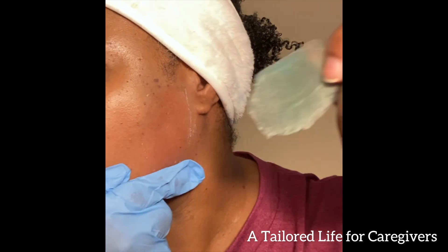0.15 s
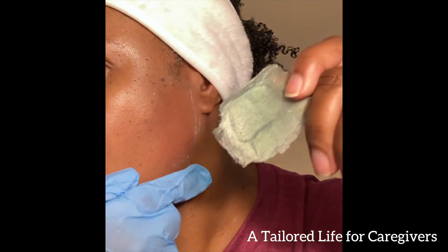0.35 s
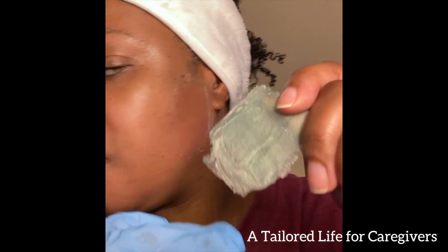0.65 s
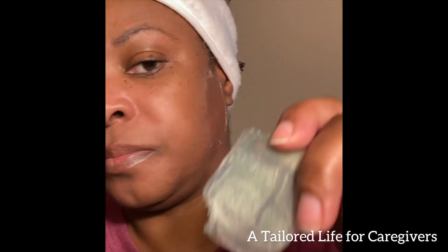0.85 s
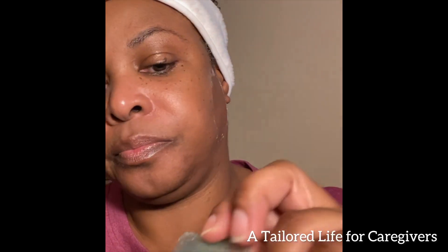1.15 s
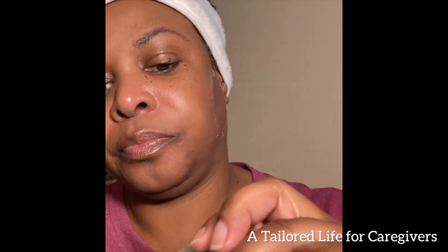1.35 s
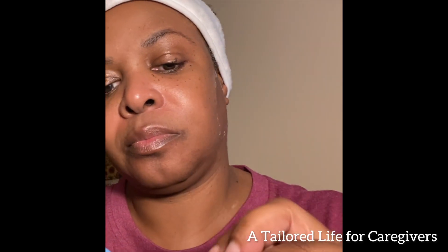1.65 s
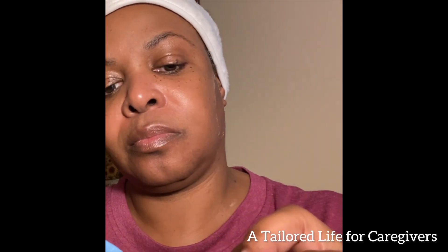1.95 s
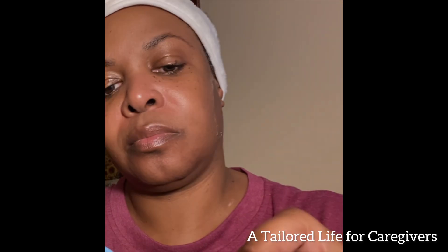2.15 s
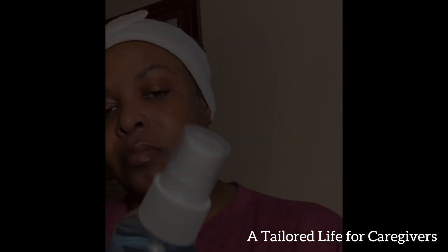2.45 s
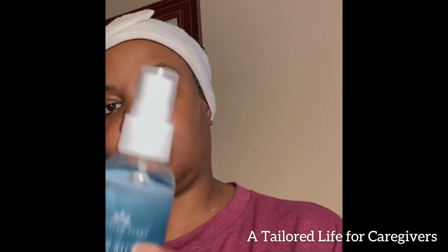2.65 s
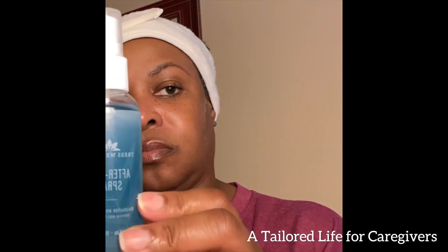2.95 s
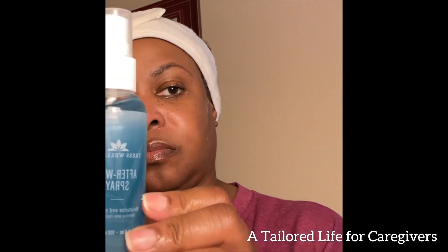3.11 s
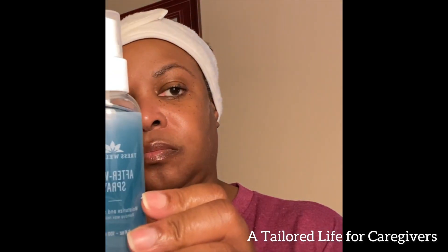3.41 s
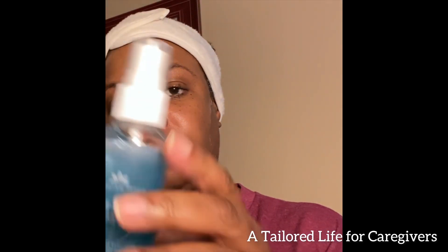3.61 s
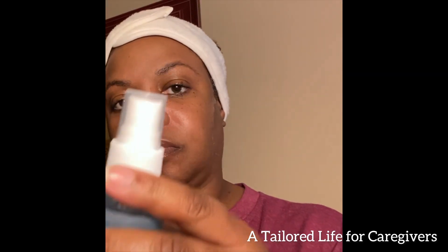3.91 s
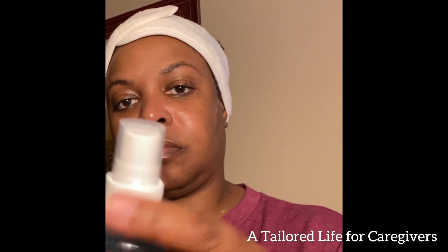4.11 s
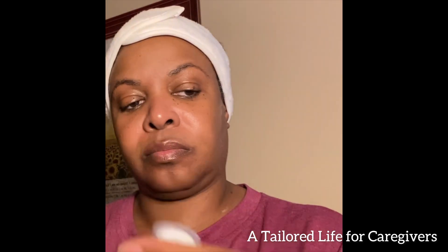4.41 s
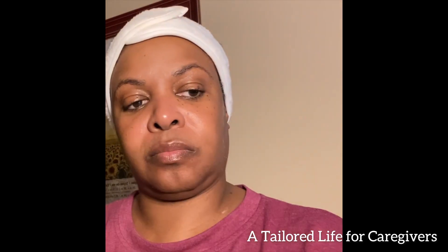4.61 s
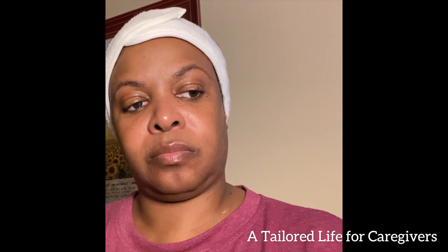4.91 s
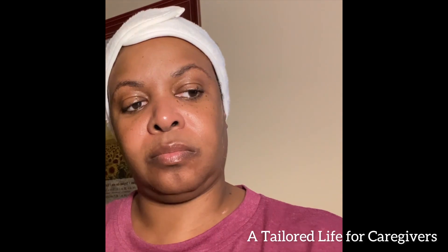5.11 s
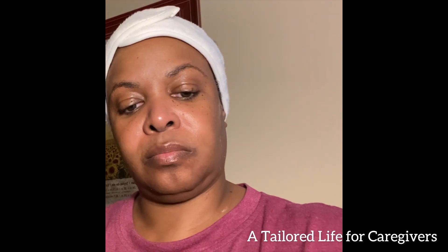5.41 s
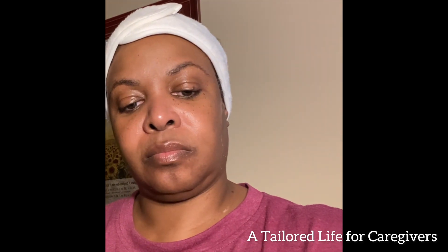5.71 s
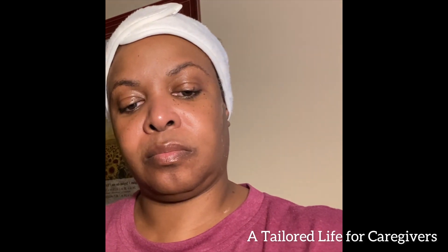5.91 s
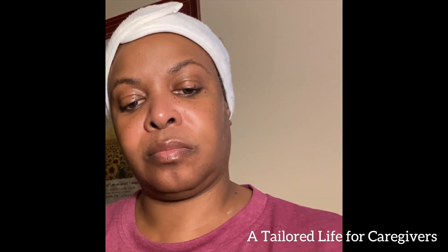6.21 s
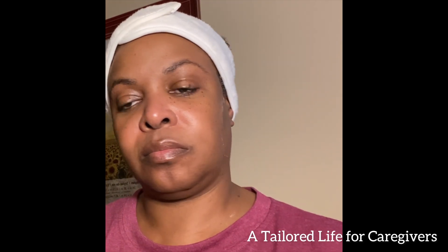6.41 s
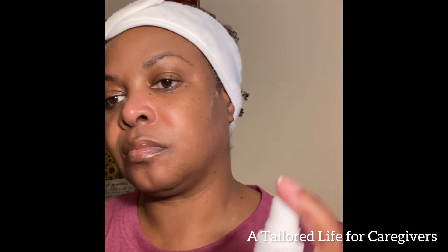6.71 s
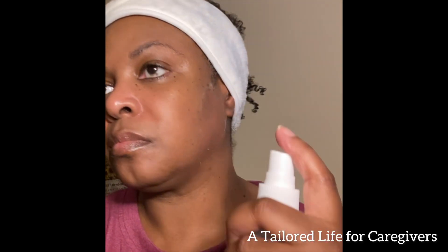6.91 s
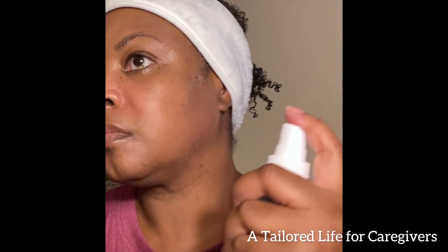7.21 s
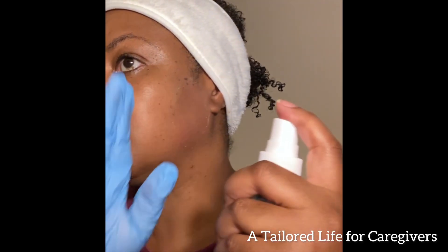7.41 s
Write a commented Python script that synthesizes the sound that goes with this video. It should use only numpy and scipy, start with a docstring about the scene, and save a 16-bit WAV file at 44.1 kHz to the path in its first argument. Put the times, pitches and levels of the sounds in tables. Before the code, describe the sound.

A quiet indoor space with ventilation running for about seven and a half seconds, captured by a single microphone at very low level. The sound is already present at the start and continues unbroken to the end. Deep, soft rumble and boom carry most of the weight, fluttering irregularly, with a slightly stronger low surge around 5.4 seconds. A faint steady motor hum sits underneath, with an almost inaudible thin whine above. Duct resonances make the air hollow; a soft mid-low drone, part breathy noise and part wavering tone, comes forward around 1.4 to 1.7, briefly near 2.8, again near 3.9, and gently around 5.7 and 7.1 seconds. Midrange air lifts very slightly near 2.3 and 4.6 seconds. The dull, thin hiss stays even throughout. No speech, spraying, clicks or handling sounds are heard.

```python
"""Ventilated room

A quiet indoor space with the ventilation running, picked up by one microphone.
Moving air is noise coloured by the narrow resonances and nulls of duct and room: it rumbles and hisses.
Several bands swell; the strongest resonance, part noise and part wandering sine, sings as a soft drone.
The fan motor adds a faint hum and a thin whine, made of three sines."""
import sys
import numpy as np
from scipy.fft import rfft, irfft, next_fast_len
from scipy.io import wavfile
from scipy.ndimage import uniform_filter1d, map_coordinates

SR = 44100
rng = np.random.default_rng(int(sys.argv[2]) if len(sys.argv) > 2 else 0)


def unload_wav(signal):
    """Save mono or channel-first audio to the path in sys.argv[1] as 16-bit WAV at rate SR, clipped to [-1, 1]."""
    wavfile.write(
        sys.argv[1],
        SR,
        np.round(np.clip(np.atleast_2d(signal).T, -1, 1) * 32767).astype(np.int16),
    )


N = 332955  # length in samples

# resting rms levels of the swelling bands, in dB
RUMBLE_DB, BOOM_DB, ROOM_MODE_DB = -55.5, -57, -64
DRONE_DB, OVERDRONE_DB, RUSH_DB = -68, -67, -68
# the sine within the drone: centre pitch, pitch wander, and its share of the drone's power (0 to 1)
DRONE_HZ, DRONE_WANDER_HZ, DRONE_TONE_SHARE = 473.4, 1.4, 0.72
TOP_HZ = 14500  # upper band limit of the recorder


def amp(db):
    """Decibels to amplitude gain."""
    return 10 ** (np.asarray(db) / 20)


def along(points, hz):
    """Join (Hz, value) points by straight lines on a log frequency axis."""
    point_hz, value = np.transpose(points)
    return np.interp(np.log(hz + 1), np.log(point_hz + 1), value)


def wobble(rate):
    """A smooth random curve through rate random knots a second."""
    knots = rng.standard_normal(int(N * rate / SR) + 4)
    return map_coordinates(knots, [np.arange(N) * rate / SR])


def filtered(x, response):
    """Shape the spectrum of x by a gain that depends on frequency."""
    size = next_fast_len(N + SR // 2)  # padded so the end does not wrap onto the start
    hz = np.fft.rfftfreq(size, 1 / SR)
    return irfft(rfft(x, size) * response(hz), size)[:N]


def band(x, low_hz, high_hz):
    """The part of x between two frequencies, with sharp edges."""
    return filtered(x, lambda hz: (hz > low_hz) & (hz < high_hz))


def tone(hz, wander_hz):
    """A sine of rms 1 that wanders slightly in pitch, from a random starting phase."""
    turns = np.cumsum(hz + wander_hz * wobble(rate=8)) / SR + rng.random()
    return np.sqrt(2) * np.sin(2 * np.pi * turns)


def swelling(x, rest_db, swells):
    """Level a band slowly, then let it rise in bell-shaped swells; its fast flutter stays random."""
    t = np.arange(N) / SR
    # length_s spans the points where the lift is half its peak in dB
    lift_db = sum(rise_db * 0.5 ** ((2 * (t - peak_s) / length_s) ** 2)
                  for peak_s, length_s, rise_db in swells)
    # two quarter-second averages in a row
    power = uniform_filter1d(uniform_filter1d(x ** 2, size=SR // 4), size=SR // 4)
    levelled = x / np.sqrt(np.abs(power) + 1e-20)
    return levelled * amp(rest_db + lift_db)


def duct_colour(hz):
    """The broad spectrum of turbulence, lifted at every resonance and notched at every null."""
    # air noise before resonances, nulls and band levelling: pitch_hz, density_db (per Hz)
    air_spectrum = [(20, -94), (30, -97.5), (36, -75.5), (130, -75.5), (200, -80), (330, -85), (520, -90.5),
                    (700, -93.5), (1400, -101.2), (1600, -103.1), (2700, -110.5), (6500, -118.6),
                    (11800, -124.9), (14400, -131.4)]
    # resonances of duct and room: centre_hz, half_width_hz, added_db (peak power added, relative to the air)
    resonances = [(53.8, 1.8, 6), (75.4, 11, 7.5), (100, 2.7, 8.5), (181, 17.7, 3), (223.7, 6, 3),
                  (251, 2.7, 5), (261.6, 6, 11), (284, 4.6, 2), (300, 4.7, 2.5), (374.3, 4.5, 6.5),
                  (390.5, 10, 5), (411.7, 4.9, 6.5), (440.5, 6.5, 7.5), (476.7, 6, 15), (490, 4, 1.5),
                  (515, 5, 7.5), (525.6, 6.5, 13.5), (568.4, 5, 7.5), (596, 4.5, 8.5), (633, 8.2, 0.5),
                  (683.5, 8, 6.5), (711, 8, 1.5), (784.6, 25, 8.5), (877, 8, 3), (922, 6.5, 7.5),
                  (1040.4, 11, 7), (1112, 21, 3.5), (1190, 18, 2.5), (1215, 8, 5), (1252, 7.3, 5.5),
                  (1313, 16, 5.5), (1370, 9, 3), (1424, 35, 3), (2090, 16, 3.5), (3380, 38, 1.5),
                  (3520, 30, 3)]
    # room nulls at the microphone: centre_hz, half_width_hz, depth_db
    nulls = [(124.4, 2.1, 5), (209, 5, 0.5), (272, 3, 3.5), (307, 2.1, 1.5), (359, 5, 4.5), (408, 4, 4),
             (426, 4.7, 3), (499, 3.4, 2.5), (548, 5.8, 1.5), (583, 4.5, 5), (661, 9, 2.5), (1078, 9, 3),
             (1180, 11, 3), (1260, 9.9, 2.5)]
    # half_width_hz off centre, a peak's added power or a null's depth in dB is down to a quarter
    added_power = sum(amp(added_db) ** 2 / (1 + ((hz - centre) / width) ** 2) ** 2
                      for centre, width, added_db in resonances)
    notch_db = sum(depth_db / (1 + ((hz - centre) / width) ** 2) ** 2
                   for centre, width, depth_db in nulls)
    return amp(along(air_spectrum, hz) - notch_db) * np.sqrt(1 + added_power)


def airflow():
    """Turbulence rings duct and room; six bands swell now and then while the hiss stays even."""
    # swells of each band: peak_s, length_s, rise_db
    rumble_swells = [(1.1, 0.39, 3.5), (1.818, 0.43, 4), (2.6, 0.52, 3), (2.98, 0.09, 3.5),
                     (4.42, 0.36, 2.8), (5.36, 0.12, 8.5), (5.793, 0.19, 5), (6.4, 0.5, 2.5)]
    boom_swells = [(1.75, 0.85, 2.5), (3.937, 0.094, 5), (5.05, 0.26, 2.5), (5.72, 0.68, 1.5),
                   (6.55, .35, 3), (7.353, 0.12, 5)]
    room_mode_swells = [(.98, 0.23, 5), (1.966, 0.12, 6), (4.116, 0.11, 5.5), (4.87, 0.25, 5.5),
                        (5.58, 0.23, 5.5), (6.005, 0.11, 8), (7.044, 0.11, 8.5)]
    drone_swells = [(.15, .15, 4), (1.418, 0.15, 6), (1.686, 0.16, 9), (2.83, 0.07, 10), (3.88, 0.47, 7.5),
                    (5.68, 0.5, 3.5), (7.082, 0.45, 5)]
    overdrone_swells = [(.17, .25, 1), (1.7, 0.32, 2), (2.323, 0.15, 7), (2.9, 0.33, 3.5), (4.42, 0.15, 2),
                        (5.12, .35, 3), (5.8, 0.24, 3)]
    rush_swells = [(2.33, 0.44, 1.2), (2.9, .45, 0.5), (4.6, .6, 0.8)]

    turbulence = rng.standard_normal(N) * np.sqrt(SR / 2)  # unit power per Hz
    air = filtered(turbulence, duct_colour)
    rumble = band(air, 45, 115)
    boom = band(air, 125, 210)
    room_mode = band(air, 240, 285)  # a low room resonance above the boom
    drone = band(air, 462, 486)  # the strongest duct resonance
    overdrone = band(air, 500, 548)  # a broader resonance just above the drone
    rush = band(air, 850, 1500)  # midrange
    even = air - rumble - boom - room_mode - drone - overdrone - rush

    breath = np.sqrt(1 - DRONE_TONE_SHARE) * drone / np.std(drone)
    singing = breath + np.sqrt(DRONE_TONE_SHARE) * tone(DRONE_HZ, DRONE_WANDER_HZ)

    return (even
            + swelling(rumble, RUMBLE_DB, rumble_swells)
            + swelling(boom, BOOM_DB, boom_swells)
            + swelling(room_mode, ROOM_MODE_DB, room_mode_swells)
            + swelling(singing, DRONE_DB, drone_swells)
            + swelling(overdrone, OVERDRONE_DB, overdrone_swells)
            + swelling(rush, RUSH_DB, rush_swells))


def motor():
    """Shaft turn, magnetic hum and whine: faint lines of steady level, each wandering in pitch."""
    # motor lines: pitch_hz, level_db (rms), wander_hz
    motor_lines = [(58.6, -66, 0.13), (119.35, -63.5, 0.027), (2050, -96.5, 6)]
    return sum(amp(level_db) * tone(hz, wander_hz) for hz, level_db, wander_hz in motor_lines)


def scene():
    """Air and motor add up at one microphone."""
    return (airflow() + motor())[None]


def record(dry):
    """The recorder keeps nothing above its band limit."""
    return np.array([filtered(channel, lambda hz: hz < TOP_HZ) for channel in dry])


dry = scene()
out = record(dry)
unload_wav(out)
```